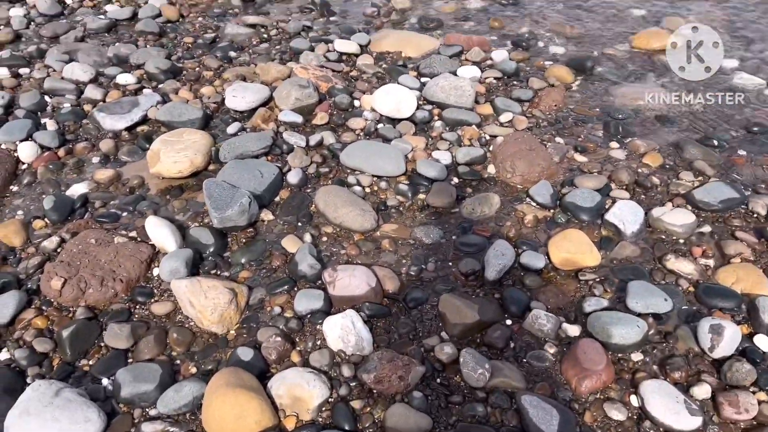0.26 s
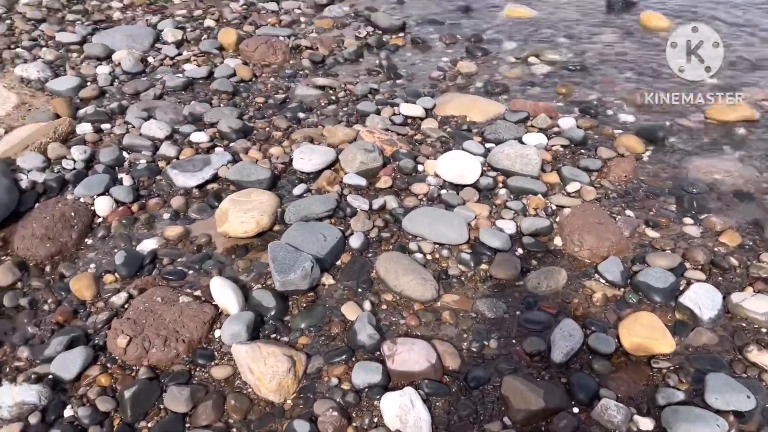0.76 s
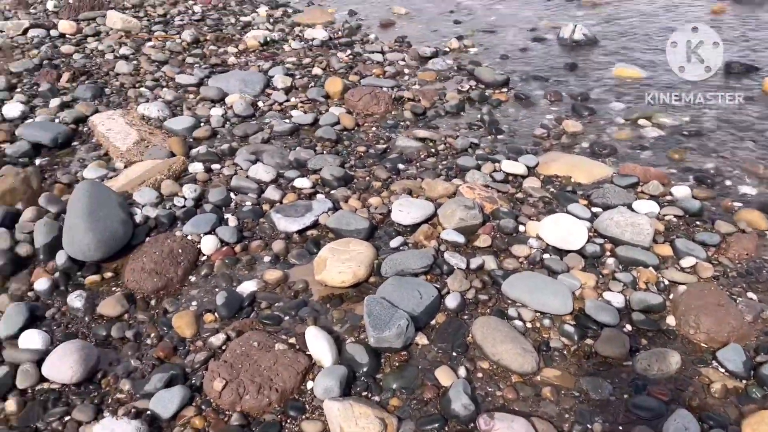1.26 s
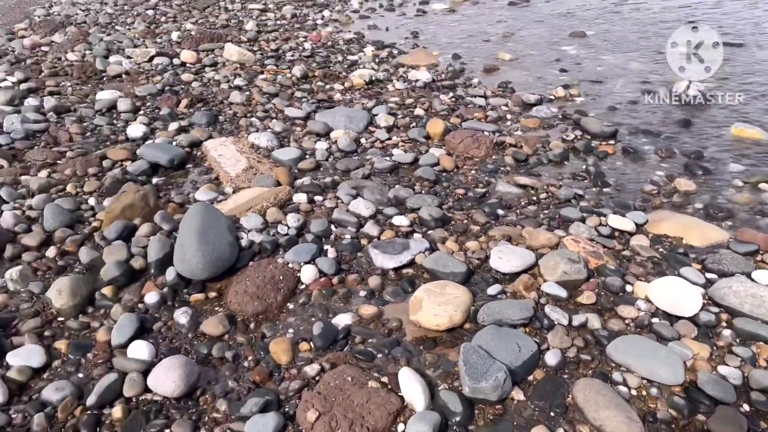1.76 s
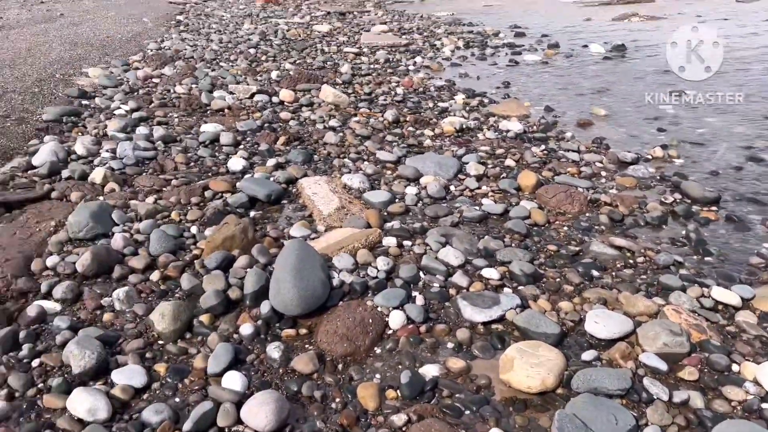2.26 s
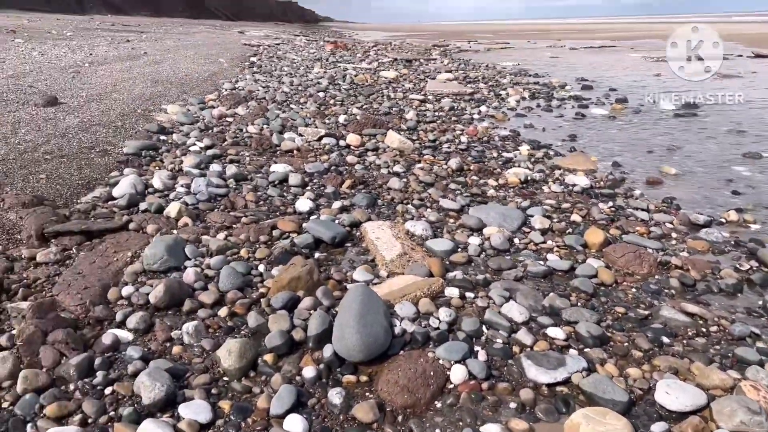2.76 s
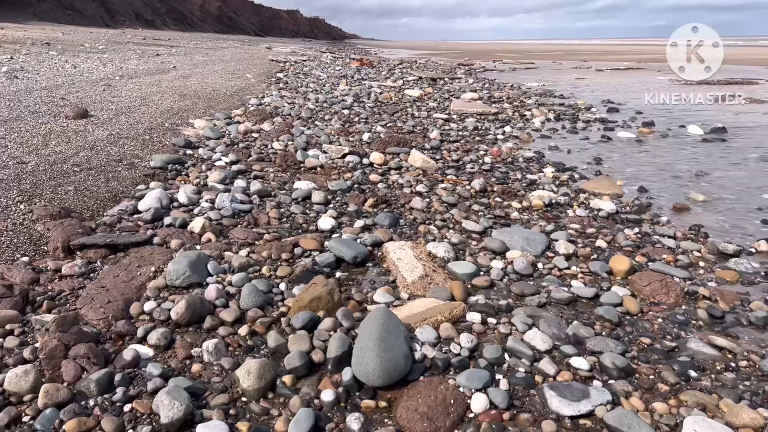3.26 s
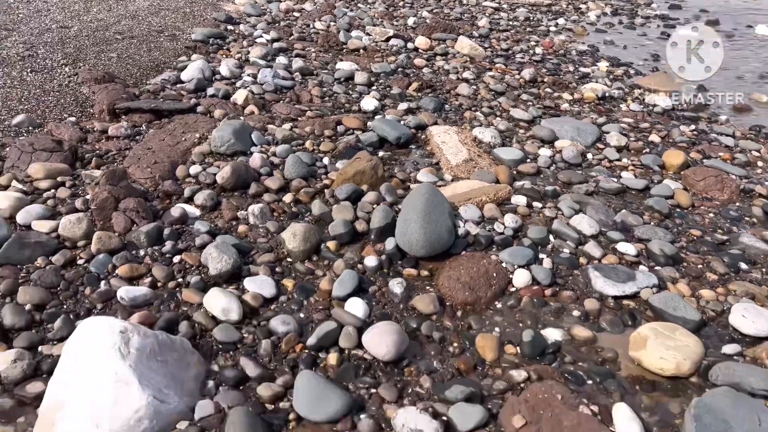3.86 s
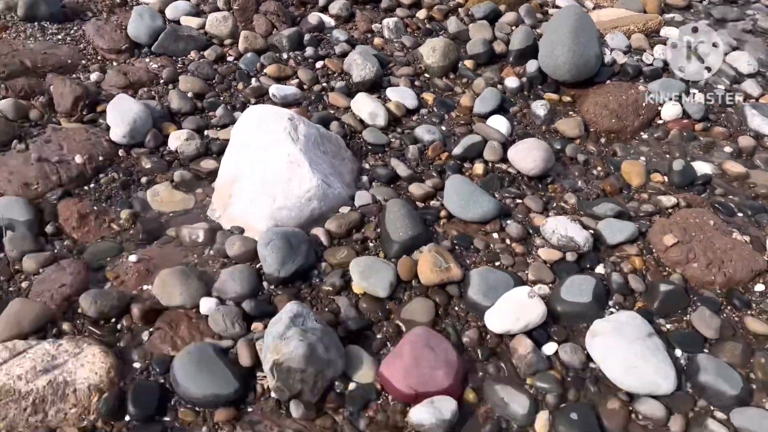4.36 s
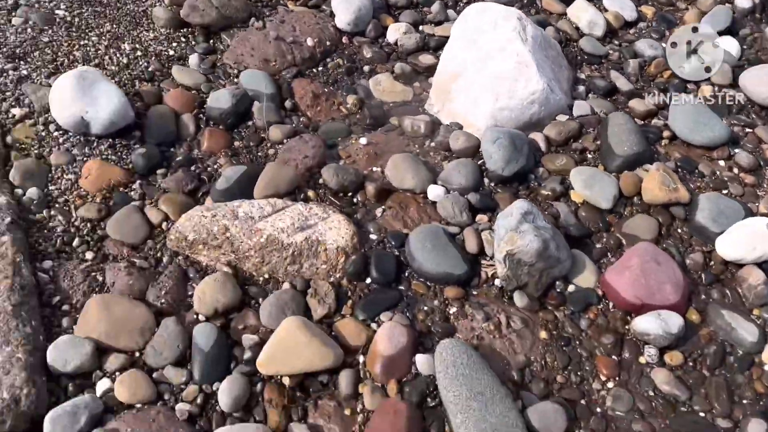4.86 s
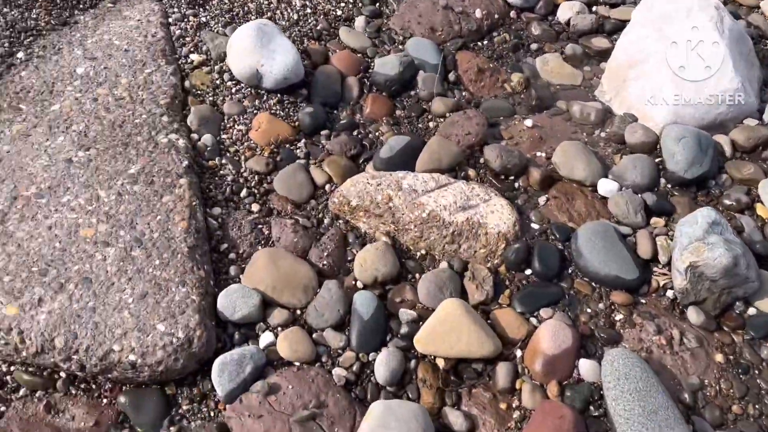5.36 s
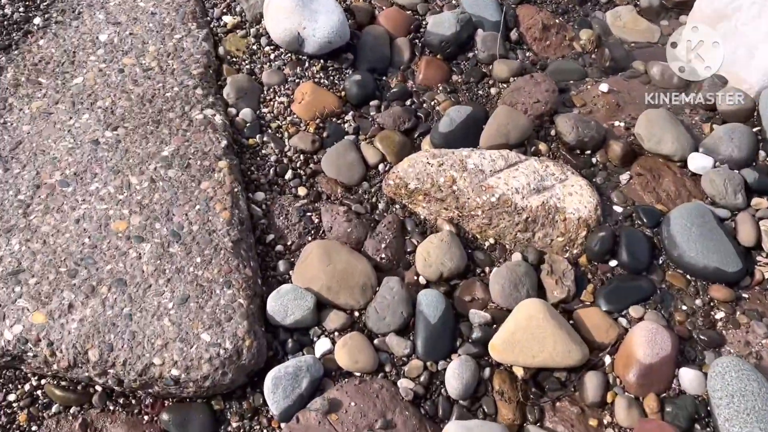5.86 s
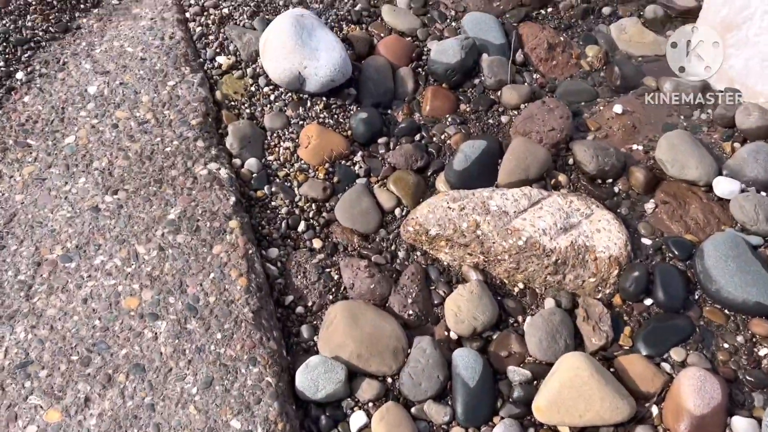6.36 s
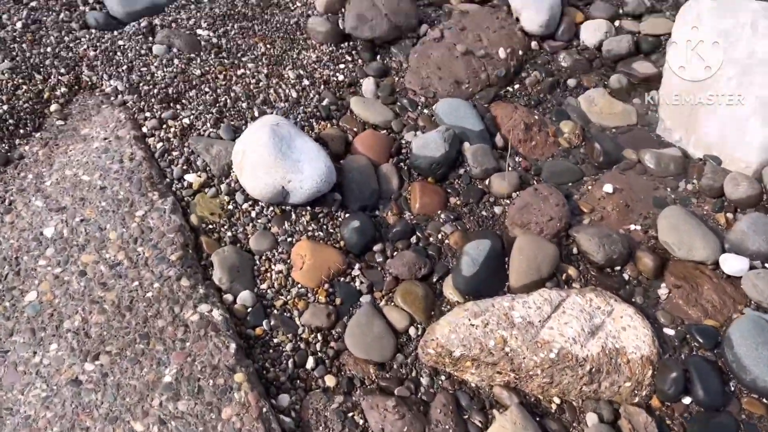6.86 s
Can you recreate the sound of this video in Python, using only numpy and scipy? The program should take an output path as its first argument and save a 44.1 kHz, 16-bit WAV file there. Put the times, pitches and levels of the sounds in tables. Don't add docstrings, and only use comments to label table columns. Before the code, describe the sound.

Fluttering, tearing wind gusts over faint distant surf, with sleeve swishes, then clicking pebbles and a deep stony crunch of footsteps.

```python
import sys
import numpy as np
from scipy import signal
from scipy.io import wavfile
from scipy.ndimage import uniform_filter1d

SR = 44100
rng = np.random.default_rng(int(sys.argv[2]) if len(sys.argv) > 2 else 0)


def level_to_linear(level):
    exponent = np.asarray(level, float) / 20
    return 10 ** exponent


def master(y):
    cut = np.clip(np.atleast_2d(y).T, -1, 1)
    pcm = np.round(cut * 32767)
    wavfile.write(sys.argv[1], SR, pcm.astype(np.int16))


N = 313110

# [start t/s, hold t/s, slow swings level/dB, flutter level/dB]
SQUALL = [
    (0, 0.067, -15, -26),
    (.255, 0.11, -24, -23.5),
    (.365, 0.083, -16.5, -23),
    (.495, 0.22, -17, -20.5),
    (.778, 0.064, -35, -27),
    (.93, 0.037, -31, -30),
    (1.05, 0.02, -29, -27.5),
    (1.085, 0.05, -20.5, -21),
    (1.16, 0.17, -25.5, -29),
]
# [start t/s, hold t/s, slow swings level/dB, flutter level/dB]
GUSTS = [(1.398, 0.0081, -19.5, -38), (1.59, 0.1, -25.5, -30), (1.761, 0.02, -27.5, -37),
         (1.857, 0.14, -26, -33.5), (2.252, 0.05, -28, -33.5), (2.338, 0.013, -23, -35),
         (2.799, 0.059, -23.5, -36), (2.896, 0.24, -30, -37.5), (3.353, 0.18, -29, -40.5),
         (3.639, 0.034, -36, -32.5), (3.897, 0.16, -22.5, -33), (4.367, 0.075, -22, -43.5),
         (4.572, 0.0055, -28, -31.5), (4.678, 0.036, -20, -25.5), (4.845, 0.058, -35, -39.5),
         (5.149, 0.082, -31, -33), (5.319, 0.013, -21.5, -29.5), (5.415, 0.259, -27.5, -35.5),
         (5.835, 0.04, -36, -33), (5.902, 0.18, -24, -26), (6.17, 0.011, -31, -28),
         (6.329, 0.015, -27, -33.5), (6.546, 0.0075, -19, -35), (6.653, 0.075, -24, -22),
         (6.788, 0.019, -23.5, -33.5)]
# [t/s, lull level/dB, crest level/dB (faster air reaches higher)]
AIR = [(0, -15, -5), (1.0, -24, -9.5), (1.5, -36, -12), (2.02, -35, -63), (2.1, -36.5, -33),
       (2.74, -48, 14), (2.82, -36, -18.5), (3.3, -33.5, -3.5), (3.75, -32.5, -16), (4.1, -33.5, -12),
       (4.22, -35.5, -22), (4.5, -31.5, -37), (4.62, -34, -26), (5.05, -41, -16), (5.3, -35.5, -26.5),
       (5.76, -38.5, -16), (6.86, -46, -13.5), (7.1, -25.5, -14.5)]
# [start t/s, length t/s, peak level/dB, low ring f/Hz, high ring f/Hz]
CRUMBLES = [
    (1.743, 0.097, -30, 1440, 1870),
    (5.675, 0.074, -23.5, 1910, 3240),
    (5.862, 0.14, -24.5, 1860, 3630),
]


def evened(x):
    return x / np.sqrt(np.mean(x ** 2) + 1e-20)


def read(points, hz):
    f, value = np.transpose(points)
    return np.interp(np.log(hz + 1), np.log(f + 1), value)


def columns(rows, t):
    s, *rest = np.transpose(rows)
    return [np.interp(t, s, c) for c in rest]


def add(mix, s, sound):
    part = mix[:, round(s * SR):][:, :sound.shape[1]]
    part += sound[:, :part.shape[1]]


def stft_grid(size):
    frame_s = np.arange(4 * N // size + 5) * size / 4 / SR
    return frame_s, np.fft.rfftfreq(size, 1 / SR)[:, None]


def unit(points, hz):
    db = read(points, hz)
    return db - 10 * np.log10(np.sum(level_to_linear(db) ** 2))


def paired(common, apart, like):
    like = np.clip(like, 0, 1)
    shared = np.sqrt((1 + like) / 2) * common
    opposed = np.sqrt((1 - like) / 2) * apart
    return np.array([shared + opposed, shared - opposed])


def noise(field_db, size, patchy_db, flicker_db, apart=1):
    # [f/Hz, likeness 0-1]
    likeness = [(60, 0.65), (200, 0.92), (450, 0.18), (1500, 0.13), (3000, 0.1), (6000, 0.21), (8600, 0.55),
                (16000, 0.39)]
    bins, frames = field_db.shape
    a, b, c, d, patch = rng.standard_normal((frames, bins, 5), np.float32).T
    patch = uniform_filter1d(patch, size=4, axis=0)
    patch = evened(uniform_filter1d(patch, size=6, axis=1))
    kicks = np.minimum(rng.exponential(1, frames), 3) ** 3
    flicker = np.log(signal.lfilter([1], [1, -.75], kicks) + .5)
    flicker = evened(flicker - flicker.mean())
    like = 1 - apart * (1 - read(likeness, stft_grid(size)[1]))
    z = paired(a + 1j * b, c + 1j * d, like)
    z *= level_to_linear(field_db + patchy_db * patch + flicker_db * flicker)
    return signal.istft(z, nperseg=size, noverlap=size - size // 4)[1][:, :N]


def surges(rows, t, which, rise_db_s, fall_db_s):
    rows = np.array(rows)
    late = t[:, None] - rows[:, 0]
    loss_db = rise_db_s * np.maximum(-late, 0) + fall_db_s * np.maximum(late - rows[:, 1], 0)
    return np.sum(level_to_linear(np.maximum(rows[:, which] - loss_db, -200)) ** 2, axis=1)


def wind():
    # [f/Hz, level/dB per Hz]
    buffet = [(80, -5), (180, 4.5), (400, 3), (700, -0.5), (1800, -18.5), (2600, -35), (4000, -41),
              (7000, -71.5)]
    t, hz = stft_grid(size=256)
    lull_db, crest_db = columns(AIR, t)
    crest = read([(300, 0), (600, 1.06), (1300, 2.0), (4000, 3.0)], hz)
    gusts = surges(SQUALL + GUSTS, t, which=3, rise_db_s=845.5, fall_db_s=454.5)
    gusts = gusts * level_to_linear(crest * (crest_db + 5)) ** 2
    lulls = level_to_linear(lull_db - 10 + 0.24 * crest_db - 3 * crest) ** 2
    field_db = unit(buffet, hz) + 10 * np.log10(gusts + lulls) + 5
    flicker_db = read([(100, 0.65), (500, 1.5), (2000, 1.2)], hz)
    flutter = noise(field_db, size=256, patchy_db=4.5, flicker_db=flicker_db, apart=0.98)
    return flutter * level_to_linear([[.8], [-.8]])


def rumble():
    # [f/Hz, level/dB per Hz]
    swell_curve = [(20, -51.5), (35, -4.5), (50, 11), (75, 10), (100, -2), (150, -7), (220, -12),
                   (400, -65)]
    t, hz = stft_grid(size=1024)
    swell = evened(noise(read(swell_curve, hz) + 0 * t, size=1024, patchy_db=3.5, flicker_db=2.5))
    t = stft_grid(size=256)[0]
    power = surges(SQUALL + GUSTS, t, which=2, rise_db_s=304, fall_db_s=259)
    power = power + level_to_linear(columns(AIR, t)[0]) ** 2
    return swell * np.interp(np.arange(N) / SR, t, np.sqrt(power)) * level_to_linear(1.0)


def tears():
    # [t/s, peak level/dB]
    rip_rows = [(0.0406, -31), (0.056, -19), (0.0894, -20.5), (0.158, -22), (0.1633, -21), (0.198, -19),
                (0.262, -15), (0.28, -16.5), (0.3007, -12), (0.302, -18), (0.3118, -13.5), (0.3202, -12.5),
                (0.332, -13.1), (0.374, -14), (0.383, -14.5), (0.387, -12), (0.397, -13.5), (0.414, -14.5),
                (0.4388, -14.5), (0.4824, -15), (0.499, -14), (0.511, -13), (0.5188, -12), (0.525, -17.5),
                (0.5303, -10.5), (0.5453, -15), (0.56, -13), (0.5732, -12), (0.585, -13), (0.596, -15),
                (0.601, -11.5), (0.617, -14.5), (0.629, -14.5), (0.645, -15), (0.778, -18), (0.936, -22.5),
                (0.97, -22.5), (1.052, -22.5), (1.093, -18), (1.111, -19.5), (1.132, -19.5),
                (1.1523, -23.5), (1.1655, -20.5), (1.1892, -18), (1.243, -21), (1.2606, -22),
                (1.2712, -20.5)]
    # [t/s, peak level/dB, fall at 1 kHz
    # level/dB]
    tear_rows = [(1.672, -26.5, 20), (2.34, -14, 37), (2.784, -6, 43), (2.956, -13, 31), (3.037, -22, 19),
                 (3.077, -19, 23), (3.734, -18.5, 28), (3.754, -15, 25), (3.963, -10.5, 26.5),
                 (4.356, -23.5, 16), (4.694, -9, 45), (5.212, -7, 57), (5.578, -18.5, 36),
                 (5.621, -14.5, 32), (6.61, -23, 27), (6.189, -27, 30), (6.234, -34, 18), (2.74, -34, 17),
                 (5.951, -21, 23), (6.071, 0, 33), (6.343, -25.5, 8), (6.649, -16, 18), (6.689, -11.5, 18),
                 (6.704, -1, 22.5), (6.778, -1, 22),
                 (1.43, -31, 24), (1.59, -30, 28), (1.644, -33, 29), (1.775, -25, 38), (1.936, -29.5, 24),
                 (2.253, -31, 29), (2.274, -23, 27), (2.809, -18, 30), (2.834, -17, 32), (2.98, -22, 31),
                 (3.108, -22, 14), (3.12, -26.5, 16), (3.154, -25.5, 23), (3.176, -30, 12.5),
                 (3.345, -27, 24), (3.367, -26, 26), (3.389, -18.5, 22), (3.41, -18.5, 23),
                 (3.432, -21, 18), (3.452, -28, 29), (3.556, -31, 23), (3.583, -28, 18), (3.606, -23, 26),
                 (3.663, -24.5, 23), (3.786, -23.5, 18.5), (3.844, -20.5, 28), (3.909, -22, 19),
                 (3.924, -22, 22), (3.945, -21, 22), (3.981, -19, 21), (4.049, -29, 30), (4.399, -35.5, 6),
                 (4.667, -23, 29), (5.152, -23, 35), (5.191, -24, 28), (5.239, -28, 23), (5.41, -24, 28),
                 (5.428, -22.5, 21), (5.543, -14, 41), (5.646, -27, 18), (5.808, -29.5, 18),
                 (5.905, -19, 26), (5.94, -9, 33), (5.984, -19, 20), (6.008, -25, 10), (6.031, -17, 22),
                 (6.047, -17, 27), (6.085, -19, 20), (6.18, -18.5, 30), (6.554, -28.5, 34)]
    t, hz = stft_grid(size=128)
    rips = []
    for s, db in rip_rows:
        rips.append((s, db, max(11 - 0.81 * (db + 17.5) + 1.5 * s, 3)))
    s, db, fall_db = np.transpose(rips + tear_rows)
    fast = np.arange(len(s)) < len(rips)
    db = db + 6 * fast
    length_s = np.where(fast, 0.0029, 0.0046)
    u = np.maximum(t[:, None] - s + 0.0012, 0) / length_s
    colour = level_to_linear(db - 3.0 - fall_db * (hz / 1000) ** 1.35) ** 2 * np.minimum(hz / 500, 1)
    power = colour @ ((u * np.exp(1 - u)) ** 3).T + 1e-14
    bursts = noise(10 * np.log10(power), size=128, patchy_db=1.5, flicker_db=0, apart=0.16)
    return bursts * level_to_linear([[1.5], [-1.5]])


def slaps():
    # [t/s, peak level/dB, first pitch f/Hz]
    slap_rows = [(1.088, -12, 300), (1.128, -17, 280), (1.281, -13.5, 198), (1.383, -17, 277),
                 (1.451, -12.5, 189), (1.6, -15.5, 206), (1.665, -14, 109), (1.937, -12, 220),
                 (2.254, -24, 236), (2.343, -16.5, 254), (2.784, -16.5, 190), (3.077, -18.5, 292),
                 (3.755, -19.5, 523), (4.511, -22, 203), (4.576, -17, 198), (4.673, -29, 275),
                 (5.196, -19.5, 265), (5.32, -30, 243), (5.927, -8, 326), (5.957, -7, 368),
                 (6.067, -12, 276), (6.311, -14.5, 193), (6.34, -12.5, 253), (6.428, -23, 149),
                 (6.531, -16, 273), (6.553, -18, 227), (6.661, -15, 200), (6.7, -6, 303), (6.776, -2, 564),
                 (6.7857, 1, 146)]
    out, t = np.zeros((2, N)), np.arange(2200) / SR
    for (s, db, hz), draw in zip(slap_rows, rng.random((len(slap_rows), 2))):
        pitch_hz = 70 + (1.43 * hz - 70) * np.exp(-t / 0.0086)
        turns = np.cumsum(pitch_hz) / SR
        rise = (1 - np.exp(-t / .0012)) ** 2
        shape = rise * np.exp(-t / 0.0064) * np.cos(np.pi / 2 * t / t[-1])
        swings = np.sin(2 * np.pi * (turns + .5 + 0.18 * draw[:, None]))
        add(out, s, level_to_linear(db + 3.0) * shape * paired(*swings, 0.98))
    return out * level_to_linear([[.6], [-.6]])


def snaps():
    # [t/s, level/dB]
    snap_rows = [(0.3013, -41), (0.305, -27.5), (0.3115, -35), (0.3183, -38), (0.325, -34), (0.3317, -27.5),
                 (0.3756, -37), (0.384, -36), (0.3945, -30), (0.3982, -33), (0.4166, -37), (0.44, -43),
                 (0.5018, -34), (0.5109, -36), (0.516, -35), (0.525, -35), (0.531, -27), (0.5456, -37),
                 (0.5813, -19.5), (0.587, -12.5), (0.605, -36), (0.6443, -37)]
    out, t = np.zeros((2, N)), np.arange(400) / SR
    edge = signal.butter(3, [1200, 3200], "band", fs=SR, output="sos")
    u = t / 0.00062
    for (s, db), z in zip(snap_rows, rng.standard_normal((len(snap_rows), 2, len(t)))):
        burst = paired(*z, 0.85) * u * np.exp(-u)
        add(out, s, level_to_linear(db) * evened(signal.sosfilt(edge, burst)) * level_to_linear([[-7], [-10]]))
    return out


def strokes(t, which, still_db):
    # [start t/s, hold t/s, bright level/dB, dull level/dB]
    swish_rows = [(0, 0.0064, -61, -50), (.66, 0.1, -53.5, -92), (.8, 0.13, -48.5, -50),
                  (1.0, 0.27, -58, -69), (1.3, 0.22, -55, -62), (1.66, 0.039, -59.5, -73),
                  (1.75, 0.063, -49.5, -69), (2.01, 0.091, -55.5, -59), (2.3, 0.29, -62.5, -81),
                  (3.88, 0.39, -71, -63), (4.62, .55, -70.5, -82), (6.12, 0.091, -59, -72),
                  (6.39, 0.51, -59, -59), (7.0, 0.11, -50, -57)]
    # [start t/s, hold t/s, bright level/dB, dull level/dB]
    crunch_rows = [(4.26, 0.083, -68, -57), (4.35, 0.078, -71, -53.5), (4.465, 0.0056, -58, -51),
                   (4.51, 0.052, -61.5, -73), (5.3, 0.012, -52, -69), (5.435, 0.066, -51.5, -58),
                   (5.57, 0.12, -57.5, -52.5), (5.685, 0.05, -60, -49), (5.725, 0.038, -45, -34.5),
                   (5.8, 0.064, -53, -46), (5.9, 0.017, -56.5, -32), (5.94, 0.054, -50, -33.5),
                   (5.99, 0.036, -50, -38.5), (6.04, 0.051, -52, -44), (6.345, 0.023, -54, -44)]
    swish = surges(swish_rows, t, which, rise_db_s=184, fall_db_s=238)
    crunch = surges(crunch_rows, t, which, rise_db_s=504, fall_db_s=462)
    return 10 * np.log10(swish + crunch + level_to_linear(still_db) ** 2)


def scrape():
    # [f/Hz, level/dB per Hz]
    bright_curve = [(2500, 6), (4200, 2), (6000, 3.5), (8500, 4), (9500, 0), (11000, -42), (14000, -41),
                    (16000, 10)]
    dull_curve = [(700, -7), (1200, -1), (1800, -3), (3200, -4.5), (4500, -8.5), (7000, -10.5)]
    # [t/s, share 0-1, left-right level/dB]
    grit_rows = [(0, 0, 0.5), (2.5, 0.09, 3), (4.2, 0.44, 0), (4.7, 0.24, -0.5), (5.5, 0.58, 1),
                 (5.7, 0.29, 1), (6.1, 0.48, 0), (6.4, 0.45, -3), (7.1, 0.2, 5.5)]
    t, hz = stft_grid(size=256)
    bright_db = strokes(t, which=2, still_db=-91.5)
    dull_db = strokes(t, which=3, still_db=-64.5)
    dull_db = np.minimum(dull_db, bright_db + 20.5)
    power = level_to_linear(unit(bright_curve, hz) + bright_db + 8.5) ** 2
    power = power + level_to_linear(unit(dull_curve, hz) + dull_db + 1.5) ** 2
    for start, length, db, low_hz, high_hz in CRUMBLES:
        bands = np.exp(-((hz / low_hz - 1) / 0.077) ** 2) + np.exp(-((hz / high_hz - 1) / 0.037) ** 2)
        swell = np.sin(np.pi * np.clip((t - start) / length, 0, 1))
        power = power + level_to_linear(db - 21.0) ** 2 * bands * swell
    apart = np.clip(1.1 - 1.65 * columns(grit_rows, t)[0], 0, 1)
    hiss = noise(10 * np.log10(power), size=256, patchy_db=2.0, flicker_db=-1.7, apart=apart)
    grains = level_to_linear(0.57 * np.minimum(rng.exponential(1, N), 4)) * (rng.random(N) < 120 / SR)
    grains = evened(signal.lfilter([1], [1, -np.exp(-1 / (.002 * SR))], grains))
    grit, pan_db = columns(grit_rows, np.arange(N) / SR)
    grit = np.clip(grit, 0, 1)
    return hiss * (1 - grit + grit * grains) * level_to_linear([pan_db / 2, -pan_db / 2])


def clicks():
    # [t/s, peak level/dB, treble over peak level/dB]
    knock_rows = [(1.663, -35, -21), (2.508, -38, -28.5), (2.568, -31, -7), (2.5757, -33, -4),
                  (3.298, -31, -5), (3.854, -28.5, -3), (4.081, -26, -1), (4.231, -28, 1),
                  (4.2494, -33, -21), (4.3233, -32, 0), (4.3421, -38, -15), (4.3585, -29, 2),
                  (4.402, -36, 8), (4.2787, -43, -7), (4.5495, -39, -3), (4.562, -33, -3),
                  (6.734, -39, -12), (4.7206, -36, -31), (5.432, -22, -10), (5.5872, -31, -1)]
    # [t/s, peak level/dB, ring f/Hz]
    tick_rows = [(4.305, -37, 9000), (4.3633, -33, 7390), (4.3711, -39, 7550), (4.4014, -33, 7400),
                 (4.411, -38, 7310), (4.5769, -38, 8150), (5.214, -31, 6800), (5.2918, -29, 6160),
                 (5.3182, -36, 5340), (5.4258, -28, 9000), (5.4343, -23, 9300), (5.473, -33, 9000),
                 (5.4962, -34, 6000), (5.5117, -22, 8600), (5.621, -34, 8800), (5.651, -32, 9000),
                 (5.8095, -35, 5700), (6.1504, -33, 4550), (6.2966, -30.5, 8600), (6.3407, -36, 7960),
                 (6.3495, -36, 8010), (6.398, -31, 7880), (6.6257, -38, 4270)]
    # [t/s, peak level/dB, ring f/Hz]
    clack_rows = [(4.4041, -30, 1200), (4.4575, -32, 3170), (4.4628, -24.5, 3220), (4.4635, -30, 4700),
                  (4.467, -29, 3400), (4.3635, -31, 4200), (4.4726, -37, 3470), (4.733, -38, 2900),
                  (5.27, -33, 1700), (5.294, -31, 1600), (5.431, -15, 1430), (5.714, -27, 1750),
                  (5.957, -17, 1900), (6.297, -30.5, 3850), (6.361, -24, 4000), (6.3654, -26, 2600),
                  (6.4346, -36, 4130), (6.5111, -37, 4080), (6.6445, -20, 3700), (6.6447, -22, 4150)]
    tick_treble_db, clack_treble_db = 5.5, -27
    out, t = np.zeros((2, N)), np.arange(1800) / SR
    crack = signal.butter(2, [5000, 15000], "band", fs=SR)
    hits = [(s, db, 2720, treble_db) for s, db, treble_db in knock_rows]
    hits += [(*row, tick_treble_db) for row in tick_rows]
    hits += [(*row, clack_treble_db) for row in clack_rows]
    for start, length, db, low_hz, high_hz in CRUMBLES[:1]:
        for when, size, pick, tune in rng.random((26, 4)):
            hit_db = db - 9 * size - 24 * (when - .45) ** 2
            hit_hz = (low_hz if pick < .5 else high_hz) * (0.9 + 0.097 * tune)
            hits.append((start + when * length, hit_db, hit_hz, clack_treble_db))
    fade = level_to_linear(-60 * t / 0.018) * (1 - np.exp(-t / 0.00025))
    for (s, db, hz, treble_db), z in zip(hits, rng.standard_normal((len(hits), 2, len(t)))):
        z = paired(*z, 0.83)
        stone = signal.iirpeak(hz, 3.5, SR)
        ring = evened(signal.lfilter(*stone, signal.lfilter(*stone, z)))
        knock = evened(signal.lfilter(*signal.iirpeak(2750, 6, SR), z))
        wide = evened(signal.lfilter(*crack, z))
        add(out, s, level_to_linear(db - 9.0) * fade * (0.81 * ring + 0.22 * knock + 0.62 * level_to_linear(treble_db) * wide))
    return out * level_to_linear([[1.2], [-1.2]])


def grinding():
    # [t/s, peak level/dB, ring f/Hz]
    grain_rows = [(5.6863, -34, 2190), (5.6961, -28, 2210), (5.701, -28, 3030), (5.7119, -18, 3230),
                  (5.7216, -21, 3250), (5.7268, -27, 3150), (5.7331, -36, 3280), (5.7439, -32, 2780),
                  (5.7571, -22, 3160), (5.7637, -26, 1930), (5.7681, -31, 3080), (5.811, -40, 2400),
                  (5.8469, -28, 1430), (5.8621, -27, 1480), (5.886, -24, 1330), (5.8896, -31, 1490),
                  (5.8937, -25, 1430), (5.9002, -24, 2290), (5.905, -25, 4740), (5.9112, -35, 1870),
                  (5.9171, -30, 2040), (5.9223, -25, 4820), (5.9324, -24, 4580), (5.9429, -24, 3250),
                  (5.9576, -28, 1290), (5.962, -25, 4700), (5.9672, -22, 1530), (5.98, -26, 2730),
                  (5.9841, -25, 2540), (5.9901, -27, 2250), (5.9954, -29, 4000), (6.0002, -30, 1750),
                  (6.0042, -28, 1410), (6.0144, -32, 2700), (6.022, -26, 1420), (6.0305, -31, 4520),
                  (6.0626, -29, 1280), (6.0758, -30, 1550)]
    out, t = np.zeros((2, N)), np.arange(1800) / SR
    decay = level_to_linear(-60 * t / 0.037)
    attack = 1 - np.exp(-t / 0.00045)
    for (s, db, hz), (pair, over, phase, lag) in zip(grain_rows, rng.random((len(grain_rows), 4))):
        side = 0.42 * (lag - .5) * np.array([[1], [-1]]) + 2 * np.pi * phase
        turn = 2 * np.pi * hz * t
        ring = np.sin(turn + side)
        ring = ring + 0.43 * np.sin(turn * (1.03 + 0.078 * pair) + 2 * side)
        ring = ring + 0.59 * decay * np.sin(turn * (1.1 + 0.284 * over) - side)
        add(out, s, level_to_linear(db - 8) * decay * attack * ring)
    return out


def surf():
    # [f/Hz, level/dB per Hz]
    wash = [(59, -30), (100, 0), (206, -1.5), (360, -15), (1110, -10), (5280, -34.5), (9440, -62),
            (22000, -120)]
    t, hz = stft_grid(size=1024)
    return noise(unit(wash, hz) - 51 + 0 * t, size=1024, patchy_db=1.5, flicker_db=.7)


def scene():
    # [t/s, left-right level/dB]
    shelter = [(3.2, -2.5), (3.7, 0.5), (7.1, -0.5)]
    lean_db = columns(shelter, np.arange(N) / SR)[0] / 2
    air = (rumble() + wind() + tears() + slaps()) * level_to_linear([lean_db, -lean_db])
    mix = air + scrape() + clicks() + grinding() + surf() + snaps()
    return signal.sosfilt(signal.butter(4, 44, "high", fs=SR, output="sos"), mix)


def low_pass(x):
    return signal.sosfilt(signal.butter(12, 16990, fs=SR, output="sos"), x)


def record(dry):
    # [f/Hz, phase/rad]
    lead = [(0, 0), (8000, .5), (8900, -.6), (9800, -3), (10900, -3.3), (12100, -6.3), (14300, -9.4),
            (14800, -12.5)]
    further_lead = [(100, -0.64), (600, -0.71), (2000, -0.31), (3500, 0.2), (8000, 0.17)]
    # [f/Hz, left-right level/dB]
    hand = [(2000, 0), (3500, 0.5), (5200, 4.5), (6900, 5), (8100, 0.5)]
    # [f/Hz, level/dB]
    port = [(9000, -1), (9700, -3), (11500, -5.5), (13500, -28.5), (15300, -8), (15900, -14.5),
            (16100, -73)]
    # [t/s, f/Hz]
    guard = [(0, 670), (1, 800), (1.7, 455), (2.8, 190), (3.3, 92), (7.1, 15)]
    # [f/Hz, level of their difference/dB]
    blind = [(8200, 1), (8450, -20.5), (8750, -20.5), (9000, 1)]
    hz, t, z = signal.stft(dry, SR, nperseg=512, noverlap=384)
    hz = hz[:, None]
    twist = np.exp(.5j * (read(lead, hz) + read(further_lead, hz))) * level_to_linear(read(hand, hz) / 2)
    left, right = z * np.array([twist, 1 / twist]) * level_to_linear(read(port, hz))
    treble_db = 10 * np.log10(np.sum(abs(left * (hz > 5000)) ** 2, 0) + 1e-12)
    gate = level_to_linear(np.clip(1.1 * (treble_db + 58.0), -13, 0) * (hz > 10000))
    merged = 1 / np.sqrt(1 + (columns(guard, t)[0] / (hz + 1)) ** 12)
    mid = (left + right) / 2 * gate
    side = (left - right) / 2 * gate * merged * level_to_linear(read(blind, hz))
    x = signal.istft(np.array([mid + side, mid - side]), SR, nperseg=512, noverlap=384)[1][:, :N]
    x = np.tanh(x) * np.minimum(np.arange(N) / 200, 1)
    return low_pass(x)


dry = scene()
out = record(dry)
master(out)
```